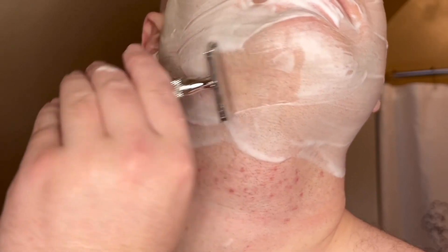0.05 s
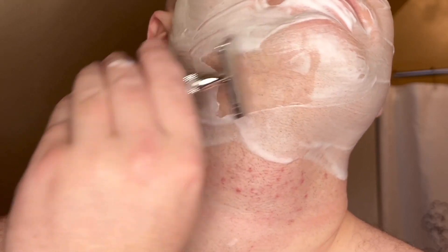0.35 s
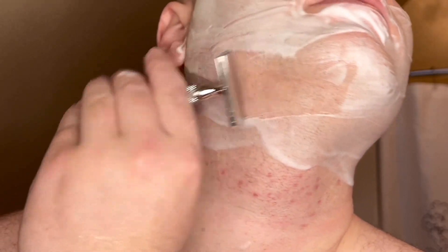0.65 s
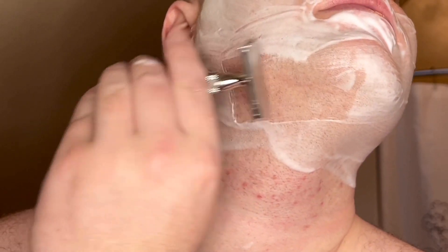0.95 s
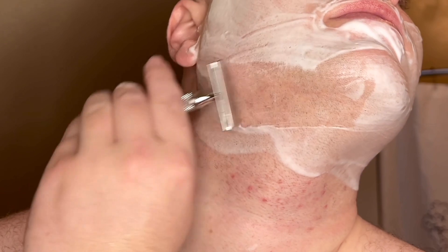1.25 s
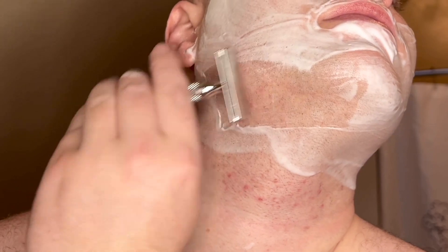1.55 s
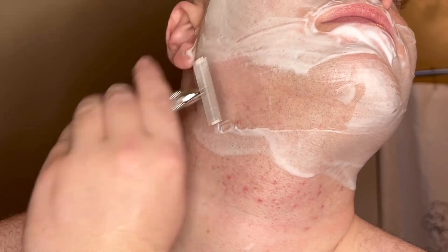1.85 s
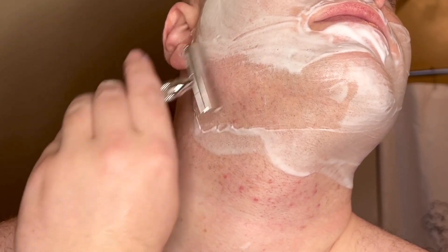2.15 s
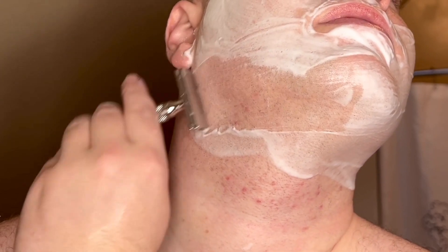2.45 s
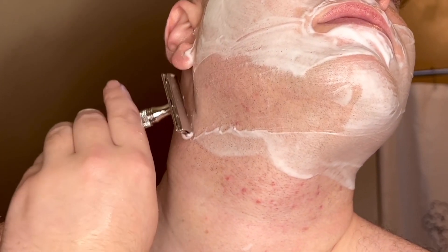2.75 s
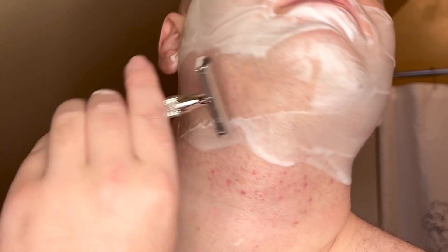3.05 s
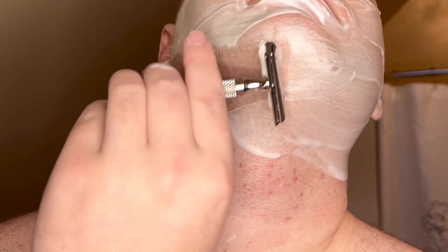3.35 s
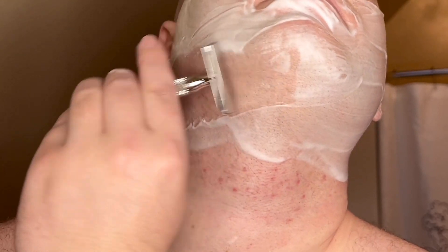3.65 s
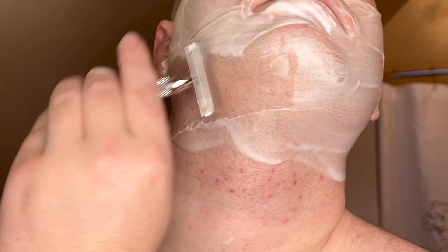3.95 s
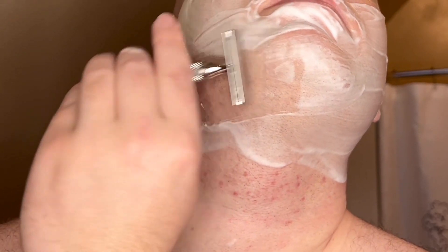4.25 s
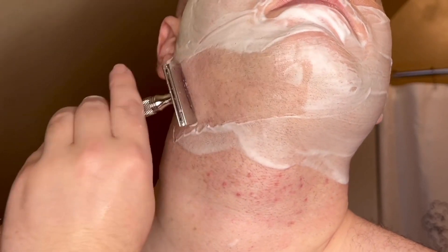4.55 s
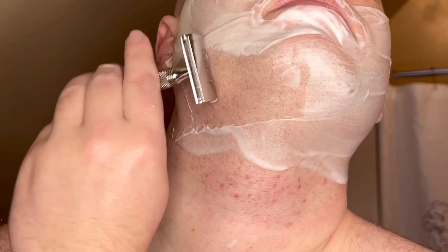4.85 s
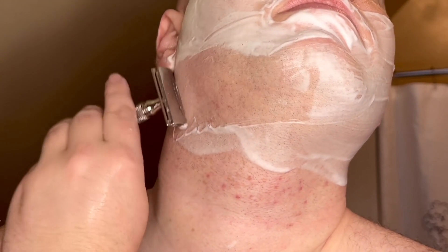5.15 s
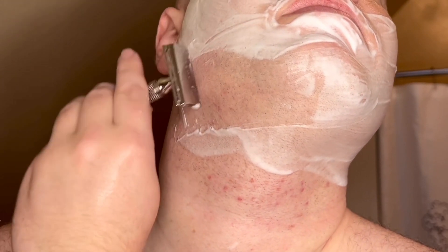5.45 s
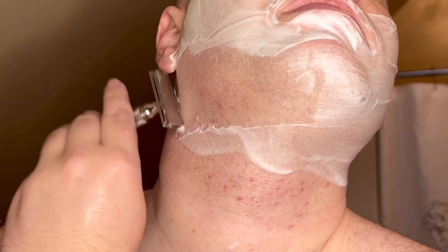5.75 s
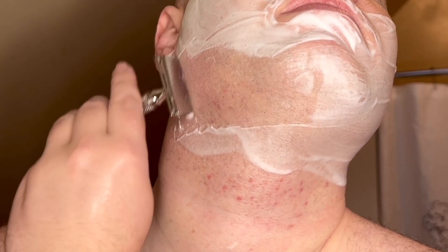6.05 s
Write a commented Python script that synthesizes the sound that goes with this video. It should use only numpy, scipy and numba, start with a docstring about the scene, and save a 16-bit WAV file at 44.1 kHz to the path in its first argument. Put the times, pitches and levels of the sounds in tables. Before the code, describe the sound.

Close up in a small bathroom, a steel safety razor makes five quick, scratchy passes over foamy stubble, rests for just under a second, then makes five more. The strokes are crisp and hissy, full of tiny snapping hairs, with light wet clicks where the blade meets or leaves the skin. A ventilation fan hums low throughout, and the room adds a short echo.

```python
"""Ten short, crackling rasps over a low hum: a safety razor shaves lathered stubble in a small bathroom.
Each hair snaps at the blade as a tiny impulse; the impulses excite the air pocket between head and
skin, the blade edge and the modes of the steel head. Foam crackles, and the head ticks as it lands and
lifts. Reflections from the tiles add a short tail, and a ventilation fan runs throughout."""
import sys
import numpy as np
from scipy import signal
from scipy.fft import rfft, irfft
from scipy.io import wavfile
from scipy.ndimage import uniform_filter1d
from numba import njit

SR = 44100
rng = np.random.default_rng(int(sys.argv[2]) if len(sys.argv) > 2 else 0)


def to_wav(sig):
    """Store sig (one row per channel, or 1-D mono) as 16-bit WAV at the path in sys.argv[1].

    Samples outside -1..1 are clipped; the rate is SR.
    """
    pcm = np.clip(np.atleast_2d(sig), -1, 1) * 32767
    pcm = np.round(pcm).astype(np.int16)
    wavfile.write(sys.argv[1], SR, pcm.T)  # frames by channels


N = 269142
TIME = np.arange(N) / SR

# Strokes: start t/s, length/s, level/dB, attack/s, release/s;
# band gains: skin rasp/dB, its growth along the stroke/dB, hollow under the head/dB, blade edge/dB;
# air pocket: lower f/Hz, its boost/dB, upper f/Hz, its boost/dB, its rise along the stroke/octaves
STROKES = [ (-0.05, 0.28, -52.5, 0.0067, 0.019, -13, 15, -2, -1, 3360, 1.5, 4460, 5, 0.05),
           (0.492, 0.29, -49.5, 0.017, 0.022, -13, 13.4, -2.5, -0.5, 3500, 2.5, 4550, 4, 0.33),
           (1.124, 0.26, -47.5, 0.017, 0.014, -12.5, 6.3, -7, 0.5, 2880, 3, 5660, 3, 0.12),
           (1.736, 0.27, -45, 0.038, 0.046, -12.5, 5.1, -8, 1, 2520, 0, 6300, 5, 0.05),
           (2.322, 0.24, -46.5, 0.029, 0.053, -11, 7.8, -8, 2.5, 2490, 3.5, 6100, 6, 0.05),
           (3.521, 0.31, -53, 0.023, 0.028, -9, 2.8, -2, 0, 3660, -0.5, 4820, 2, 0.43),
           (4.211, 0.37, -52, 0.0022, 0.029, -11, 2.7, -8.5, -2.5, 2550, 3, 5730, 2, 0.4),
           (4.901, 0.24, -45.5, 0.031, 0.048, -11.5, 14, -10, 0, 2600, 5, 5750, 7.5, 0.04),
           (5.461, 0.25, -46, 0.014, 0.056, -10, 3.6, -10.5, -2, 2530, 4.5, 5650, 4, 0.06),
           (6.027, 0.24, -47, 0.015, 0.05, -8.5, 8.7, -12.5, -1.5, 2320, 4, 6100, 5.5, 0.06), ]
# Thicker or thinner stubble: middle t/s, half-width/s, swell/dB, blade edge/dB, skin rasp/dB
STUBBLE_PATCHES = [(0.02, 0.031, 3.5, -9, -2.5), (0.1, 0.02, -3, -1, 0), (0.72, 0.035, 0, -3, 2.5),
                   (1.165, 0.025, 0.5, 3.5, -2), (1.3, 0.041, 4.5, 1, -2.5), (1.845, 0.021, 0.5, 5.5, -1),
                   (2.39, 0.035, 1, 2, -2), (2.49, 0.018, 1, 1, 3), (3.568, 0.027, 0, 13, 0),
                   (3.62, 0.016, -4, -2, 3), (4.235, 0.046, 2.5, 5, -1.5), (4.335, 0.021, -1.5, 2, -5),
                   (4.5, 0.081, 4, 2, -2), (5.69, 0.012, 4, 3, -1)]
# Spectrum of a snapping hair: f/Hz, level/dB
SNAP_SPECTRUM = [(500, 2.5), (1000, -13), (1600, -8.5), (2400, -2), (3200, -1), (4000, 2.5), (4800, 2.5),
                 (5700, 2.5), (7300, 3.5), (9000, 5), (11000, 3), (12600, 6.5), (14000, 0.5), (15700, -5.5)]
# Spectrum of a wet click, of foam or head: f/Hz, level/dB
WET_SPECTRUM = [(1000, -20), (2500, -20.5), (4300, -16), (5500, 1), (7500, -3.5), (10000, -5.5), (12600, 0),
                (16000, -9)]
# The head rests in foam without cutting: start t/s, end t/s, level/dB
FOAM_RESTS = [(0.281, 0.324, -67.5), (1.097, 1.122, -54), (2.289, 2.336, -57.5), (2.588, 2.68, -57),
              (2.685, 2.738, -66), (4.867, 4.898, -47.5), (5.412, 5.47, -58.5), (6.015, 6.03, -52)]
# Modes of the steel head: f/Hz, level/dB, T60/s
HEAD_MODES = [(2330, -15, 0.26), (3168, 4, 0.13), (3440, -5.5, 0.046), (3836, -16.5, 0.035),
              (3900, -23, 0.084), (5120, -9, .3), (6290, -19, 0.079), (7600, -10, 0.15),
              (8300, -2.5, 0.039), (10560, -5, .08), (12900, -3, 0.045), (12400, -16, .06)]
# Spectral density of the fan's air noise: f/Hz, relative level/dB
FAN_SPECTRUM = [(20, -16.5), (36, -8), (58, -0.5), (74, -2.5), (105, -0.5), (145, -4), (200, -14.5),
                (330, -17), (470, -23), (750, -25.5), (1300, -37.5), (2500, -42.5), (5000, -47.5),
                (16000, -55.5)]
# Tones of the fan's hum: f/Hz, base level/dB, waver/dB
HUM_TONES = [(118.7, -60, 2.5), (158.2, -62.5, 3)]
# The low hum is briefly a little louder around 2.5 s: middle t/s, half-width/s, gain/dB
HUM_RISE = (2.5, 0.31, 4.3)
# The head lands on or peels off wet skin: t/s, impulse level/dB, blade edge gain/dB
HEAD_TICKS = [(0.483, -44, 12), (.495, -26.5, 9.5), (0.8362, -36, -4), (.852, -37, 0), (1.094, -43, 12),
              (1.1201, -27.5, 12), (1.29, -15, 3), (1.3055, -19, -5), (1.336, -15, 2), (1.3812, -23, 6),
              (1.47, -39.5, 7), (1.7413, -37, -1), (1.75, -32, -6), (1.978, -25, 11), (2.3026, -33, -3),
              (2.315, -30, 2), (2.3336, -32.5, 13), (2.654, -33, -13), (2.669, -40, 13), (3.5234, -43, 20),
              (3.5644, -31, 7), (4.2023, -39, 2), (4.2161, -34, 16), (4.561, -30, 3), (4.8668, -34.5, -10),
              (4.875, -36, -10), (4.899, -29, -6), (5.42, -27.5, -18), (5.444, -33, -13), (5.459, -34, -9),
              (6.01, -28, -3)]
# The head sings as it springs off the skin: t/s, f/Hz, level/dB, T60/s
FREE_MODE = (1.381, 5218, -61, 0.26)

BITE_DB, EASE_DB = 11, 13  # weakening of the scrape at landing and at lifting
HOLLOW_RISE_DB, EDGE_FALL_DB = 2.5, 4.5  # the scrape darkens along a stroke as the head presses in
LOWER_FALL_OCT, UPPER_FADE = 0.18, 0.31  # along a stroke the lower resonance sinks, the upper weakens
DIP_RATIO, DIP_DB = 1.39, -1  # a dip above the upper resonance, deepest at landing
OPEN_HZ, OPEN_SHARE = 870, 0.15  # the low cut sinks towards this frequency over this share of a stroke


def undb(db):
    """Amplitude ratio: tenfold for every 20 dB."""
    return 10 ** (np.asarray(db) / 20)


def unit(x):
    """Normalisation to an rms of 1."""
    return x / np.sqrt(np.mean(x ** 2))


def steady(x, size=1300):
    """Division by a running rms evens the level but leaves single clicks standing out."""
    power = uniform_filter1d(uniform_filter1d(x ** 2, size), size)
    return x / np.sqrt(power + 1e-12)


def walk(rate_hz):
    """Random modulation: smoothed steps with an rms of 1."""
    hold = max(int(SR / rate_hz), 1)
    steps = np.repeat(rng.standard_normal(N // hold + 1), hold)
    return unit(uniform_filter1d(steps, hold)[:N])


def colour(x, spectrum, size=8192):
    """Minimum-phase filtering through points of f/Hz, level/dB."""
    hz, db = np.transpose(spectrum)
    bins = np.maximum(np.fft.rfftfreq(size, 1 / SR), 1)
    gain = undb(np.interp(np.log(bins), np.log(hz), db))
    cepstrum = irfft(np.log(gain))
    cepstrum[1:size // 2] *= 2
    cepstrum[size // 2 + 1:] = 0
    return signal.fftconvolve(x, irfft(np.exp(rfft(cepstrum))))[:len(x)]


def split(x, hz, order=4):
    """Complementary filtering: the parts below and above hz sum to x."""
    low = signal.sosfiltfilt(signal.butter(order, hz, fs=SR, output="sos"), x)
    return low, x - low


@njit
def resonator(x, hz, damping):
    """A damped second-order resonator with moving tuning: band-pass and high-pass outputs."""
    band, high = np.empty(len(x)), np.empty(len(x))
    band_state, low_state = 0., 0.
    for i in range(len(x)):
        g = np.tan(np.pi * hz[i] / SR)
        velocity = (band_state + g * (x[i] - low_state)) / (1 + g * (g + damping))
        band[i] = damping * velocity
        high[i] = x[i] - band[i] - low_state - g * velocity
        band_state, low_state = 2 * velocity - band_state, low_state + 2 * g * velocity
    return band, high


def stroke():
    """Piecewise motion: age/s and time left/s of the nearest stroke, then its other columns."""
    rows = np.array(STROKES)
    turns = (rows[:-1, 0] + rows[:-1, 1] + rows[1:, 0]) / 2
    start, length, *columns = rows[np.searchsorted(turns, TIME)].T
    return TIME - start, start + length - TIME, *columns


def travel(age, left):
    """Uniform motion of the blade along its stroke, 0 to 1."""
    return np.clip(age / (age + left), 0, 1)


def contact(age, left, land_s, lift_s):
    """Contact gates the excitation: 1 on the skin, ramping to 0 between strokes."""
    return np.clip(1 + age / land_s, 0, 1) * np.clip(1 + left / lift_s, 0, 1)


def pressure_db(age, left, attack_s, release_s):
    """Level follows force: the hand presses in after landing and eases off before lifting."""
    landing = np.exp(-np.maximum(age, 0) / attack_s)
    lifting = np.exp(-np.maximum(left, 0) / release_s)
    return -BITE_DB * landing - EASE_DB * lifting


def stubble_patches():
    """Stubble density modulates the scrape: Gaussian bumps in dB on the whole, the edge and the rasp."""
    middle, width, swell_db, bright_db, deep_db = np.transpose(STUBBLE_PATCHES)
    inside = np.exp(-np.minimum(((TIME[:, None] - middle) / width) ** 2, 20))
    return inside @ swell_db, inside @ bright_db, inside @ deep_db


def snaps(rate_hz, spread_db, bunch_db):
    """A Poisson process: hairs or bubbles give way at random moments with random strengths."""
    chance, strength = rng.random(N), np.minimum(rng.standard_normal(N), 2.3)
    return (chance < rate_hz / SR) * undb(spread_db * strength + bunch_db * walk(260))


def crumble(clicks, tail_s, tail_db):
    """Exponential decay: each click trails a noise burst of finer cracks, so no two sound alike."""
    decay = np.exp(-2 / (tail_s * SR))
    energy = signal.lfilter([1 - decay], [1, -decay], clicks ** 2 + 1e-18)
    return clicks + undb(tail_db) * np.sqrt(energy) * rng.standard_normal(N)


def air_pocket(x, lower_damping=0.22, upper_damping=0.17, dip_damping=0.3):
    """Cavity resonance: the air under the head imposes two gliding peaks and a dip above them."""
    age, left, *_, lower_hz, lower_db, upper_hz, upper_db, rise_oct = stroke()
    way = travel(age, left)
    past_middle = way - .5
    lower_hz = lower_hz * 2 ** (-LOWER_FALL_OCT * past_middle)
    upper_hz = upper_hz * 2 ** (rise_oct * past_middle)
    for hz, db, damping in [(lower_hz, lower_db, lower_damping),
                            (upper_hz, upper_db * (1 - UPPER_FADE * past_middle), upper_damping),
                            (DIP_RATIO * upper_hz, DIP_DB * (1 - way), dip_damping)]:
        x = x + (undb(db) - 1) * resonator(x, hz, damping)[0]
    return x


def scrape():
    """Source and filter: snapping hairs and lather hiss sound through skin, hollow and blade edge."""
    (age, left, level_db, attack_s, release_s,
     skin_db, skin_rise_db, hollow_db, edge_db, lower_hz, *_) = stroke()
    way = travel(age, left)
    past_middle = way - .5
    swell_db, bright_db, deep_db = stubble_patches()
    # the blade catches few hairs at first, then many, then fewer as it lifts
    bite = np.interp(way, [0, .3, .8, 1], [.3, 0.88, 0.87, .4])
    clicks = snaps(rate_hz=2000 * bite, spread_db=2.5, bunch_db=0)
    hairs = steady(crumble(clicks, tail_s=0.00065, tail_db=-6.0))
    hiss = undb(-3) * bite * rng.standard_normal(N)
    cut = air_pocket(colour(hairs + hiss, SNAP_SPECTRUM))
    # the rasp deepens as the head presses into the skin
    low_cut_hz = OPEN_HZ + (lower_hz - OPEN_HZ) * np.exp(-way / OPEN_SHARE)
    _, cut = resonator(cut, low_cut_hz, damping=0.96)
    skin, rest = split(cut, hz=2975, order=12)
    hollow, rest = split(rest, hz=5080, order=8)
    middle, edge = split(rest, hz=10640)
    # stiff hairs snap bright, soft ones dull
    edge = edge * undb(3.3 * walk(700))
    hollow = hollow * undb(walk(500))
    bands = (undb(skin_db + deep_db + skin_rise_db * past_middle) * steady(skin)
             + undb(hollow_db + HOLLOW_RISE_DB * past_middle) * steady(hollow)
             + steady(middle)
             + undb(edge_db + bright_db - EDGE_FALL_DB * past_middle) * steady(edge))
    gain = undb(level_db + pressure_db(age, left, attack_s, release_s) + swell_db)
    return contact(age, left, land_s=0.0033, lift_s=0.033) * gain * bands


def lather():
    """Shot noise: foam crackles during each stroke, just after it, and where the head rests."""
    age, left, *_ = stroke()
    stroking = undb(-57.5) * contact(age, left, land_s=.004, lift_s=0.11)
    resting = sum(undb(db) * np.interp(TIME, [start, start + 0.0037, end - .008, end], [0, 1, 1, 0])
                  for start, end, db in FOAM_RESTS)
    clicks = snaps(rate_hz=730, spread_db=4, bunch_db=5.5)
    pops = steady(crumble(clicks, tail_s=0.0014, tail_db=-1), size=2500)
    return (stroking + resting) * colour(pops, WET_SPECTRUM)


def steel_head(x):
    """Modal resonance: every click rings the steel head, which hand and skin damp."""
    out = x
    for hz, db, t60 in HEAD_MODES:
        pole = np.exp((2j * np.pi * hz - np.log(1000) / t60) / SR)
        mode = signal.lfilter([1], [1, -pole], x).real
        out = out + 2 * undb(db) * (1 - abs(pole)) * mode
    return out


def bathroom(x, gap_s=0.0032, t60_s=0.36, treble_t60_s=0.18, level_db=-12):
    """Reverberation: dense reflections from the tiles decay exponentially, the treble first."""
    t = np.arange(SR // 2) / SR
    low, high = split(rng.standard_normal(len(t)), hz=7660, order=2)
    tail = (low * undb(-60 * t / t60_s) + high * undb(-60 * t / treble_t60_s)) * (t > gap_s)
    return undb(level_db) * signal.fftconvolve(x, tail / np.linalg.norm(tail))[:N]


def fan():
    """Broadband and tonal noise: a low rush of air and two wavering motor tones."""
    air = undb(-54.0 + 0.5 * walk(7.1)) * unit(colour(rng.standard_normal(N), FAN_SPECTRUM))
    hum = np.zeros(N)
    for hz, db, waver_db in HUM_TONES:
        waver = undb(waver_db * walk(8.3))
        phase = 2 * np.pi * hz * TIME + 0.61 * walk(4.8)
        hum += undb(db) * unit(waver * np.sin(phase))
    middle, width, rise_db = HUM_RISE
    rise = undb(rise_db * np.exp(-((TIME - middle) / width) ** 2))
    return air + rise * hum


def ticks():
    """Impulse excitation: a wet click rings the air pocket as the head touches down or lets go."""
    times, level_db, edge_db = np.transpose(HEAD_TICKS)
    clicks = np.zeros(N)
    clicks[(times * SR).astype(int)] = undb(level_db)
    cracks = crumble(clicks, tail_s=.0014, tail_db=3)
    body, edge = split(air_pocket(colour(cracks, WET_SPECTRUM)), hz=9800)
    return body + undb(np.interp(TIME, times, edge_db)) * edge


def lift_ring():
    """Free vibration: one faint mode of the head dies away after it springs off the skin."""
    start, hz, db, t60 = FREE_MODE
    age = np.maximum(TIME - start, 0)
    return undb(db - 60 * age / t60) * np.sin(2 * np.pi * hz * age)


def scene():
    """Superposition of the razor's direct sound, its reverberation and the fan."""
    razor = steel_head(scrape() + ticks() + lather()) + lift_ring()
    return (undb(-1.84) * razor + bathroom(razor) + fan())[None]


def record(dry, top_hz=15900):
    """Band limiting: the phone's steep low-pass filter removes the highest treble."""
    return signal.sosfilt(signal.ellip(10, .2, 60, top_hz, fs=SR, output="sos"), dry)


dry = scene()
out = record(dry)
to_wav(out)
```